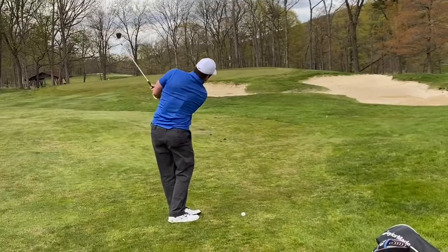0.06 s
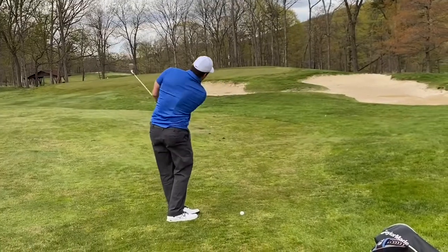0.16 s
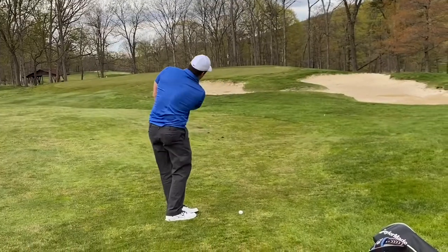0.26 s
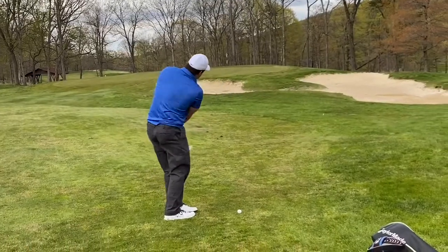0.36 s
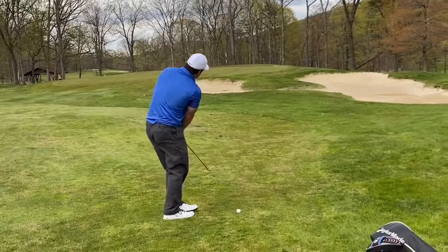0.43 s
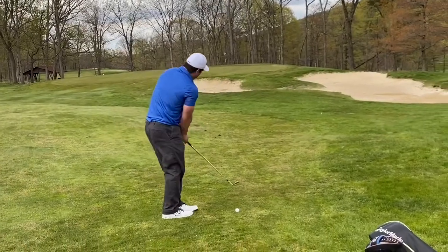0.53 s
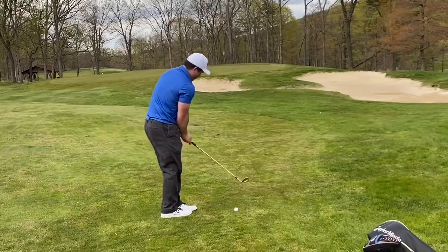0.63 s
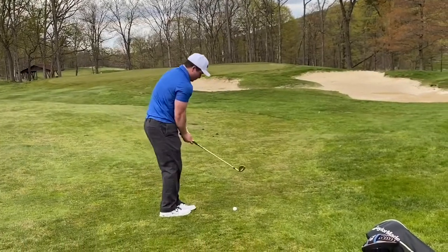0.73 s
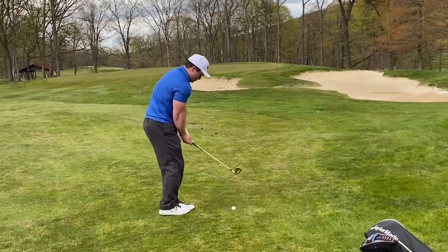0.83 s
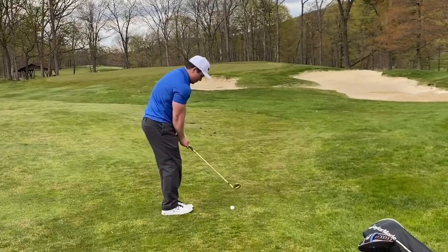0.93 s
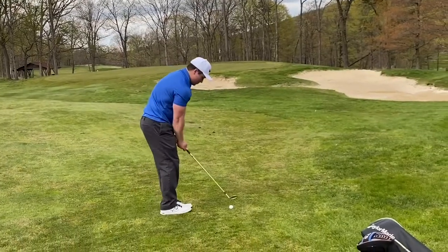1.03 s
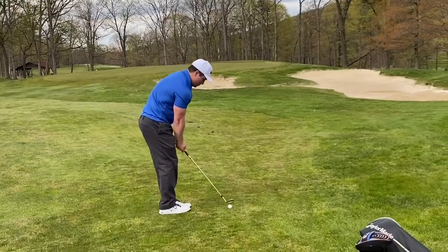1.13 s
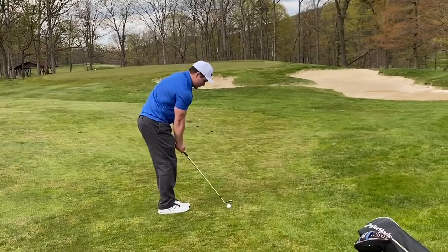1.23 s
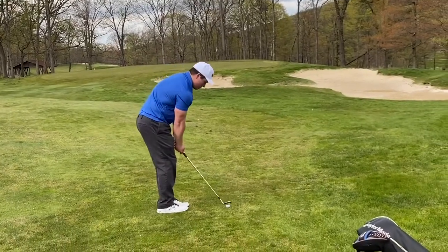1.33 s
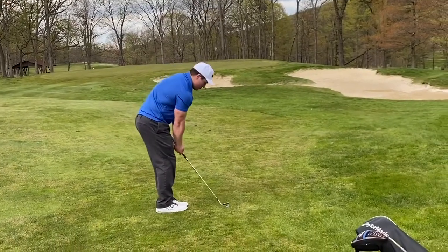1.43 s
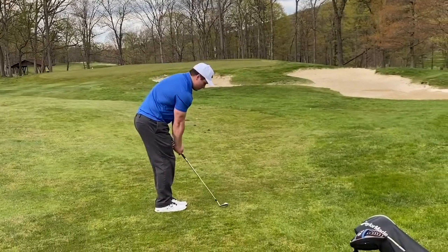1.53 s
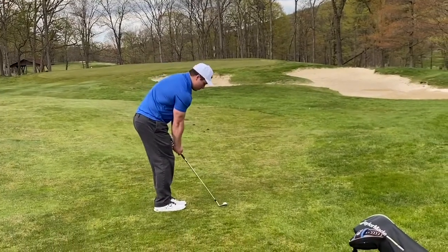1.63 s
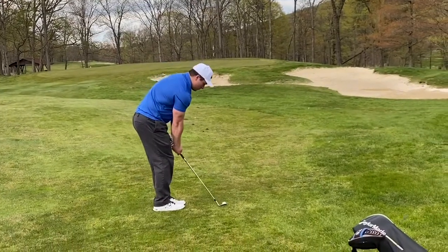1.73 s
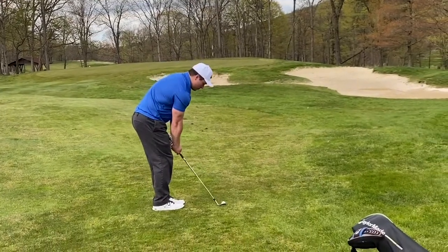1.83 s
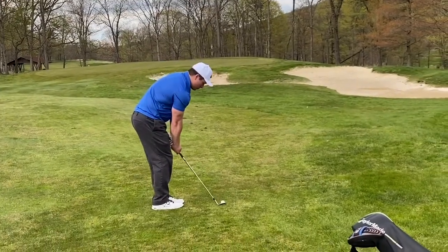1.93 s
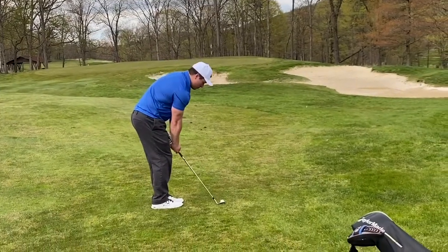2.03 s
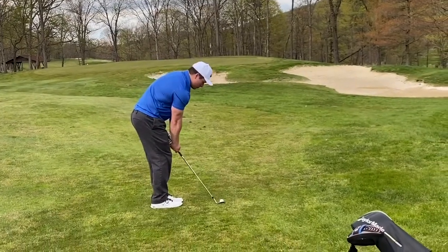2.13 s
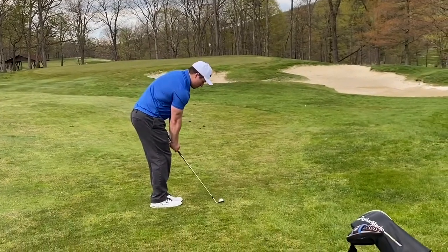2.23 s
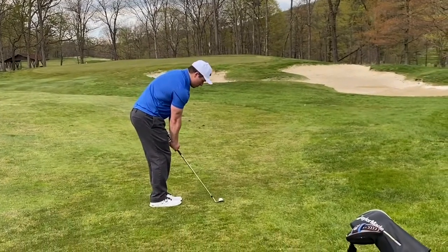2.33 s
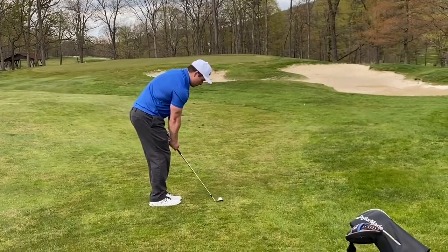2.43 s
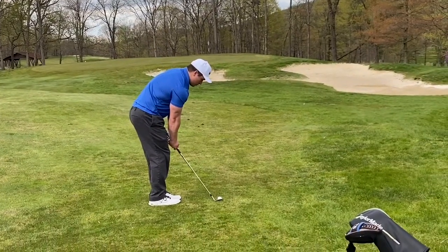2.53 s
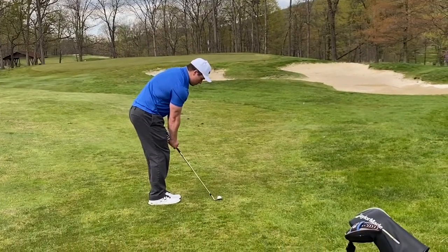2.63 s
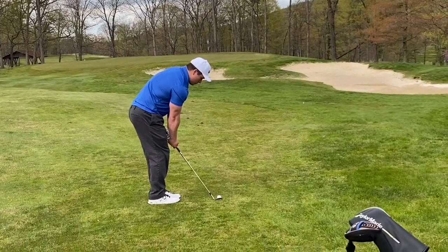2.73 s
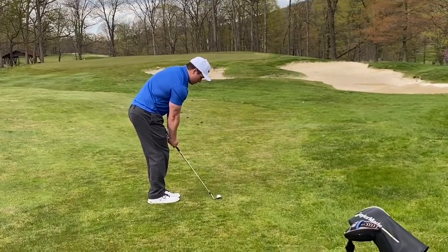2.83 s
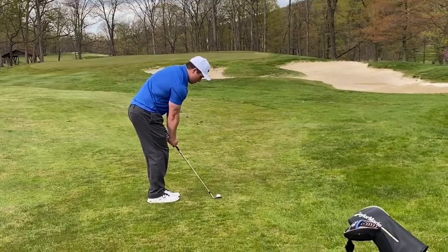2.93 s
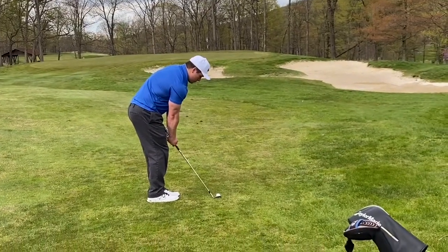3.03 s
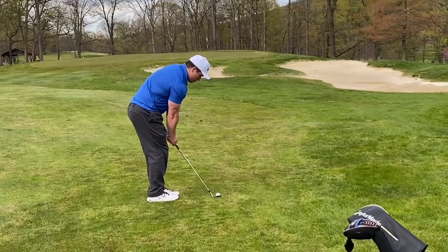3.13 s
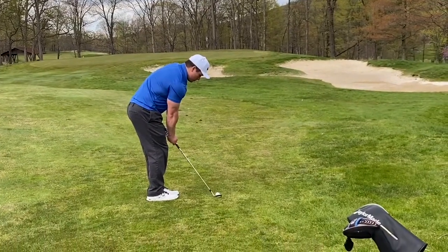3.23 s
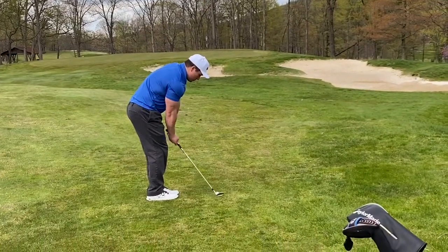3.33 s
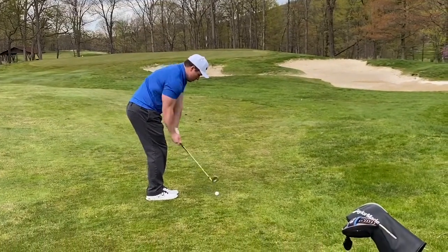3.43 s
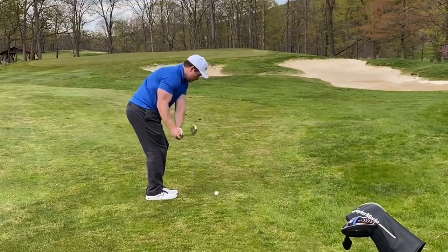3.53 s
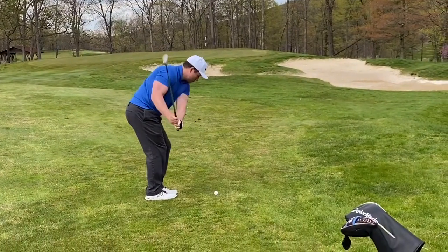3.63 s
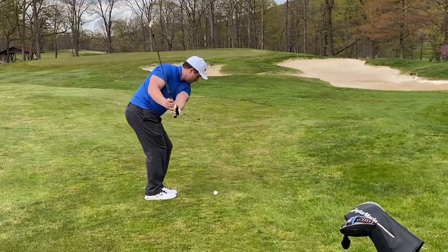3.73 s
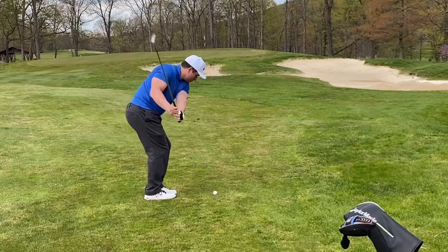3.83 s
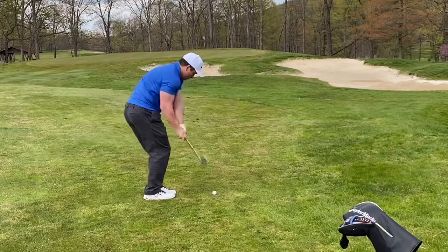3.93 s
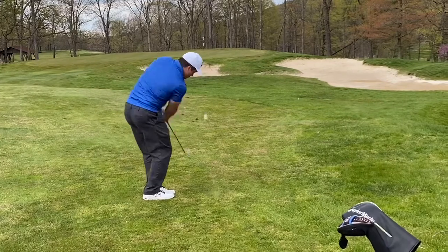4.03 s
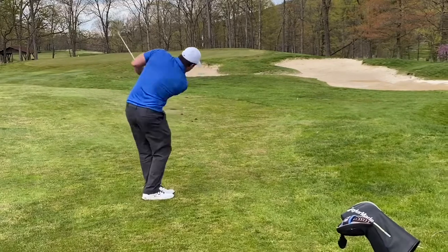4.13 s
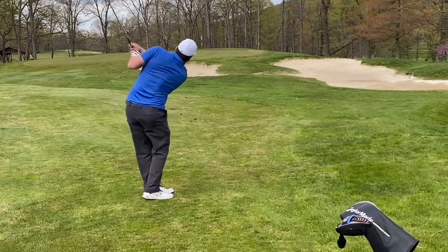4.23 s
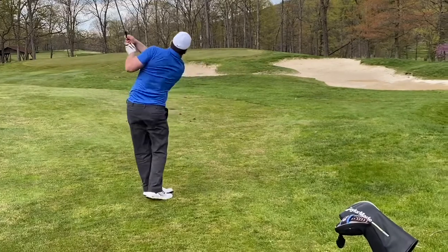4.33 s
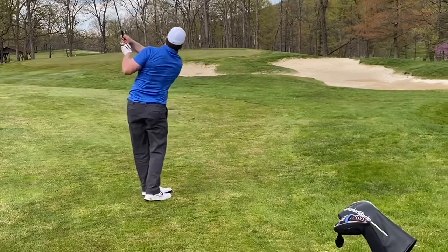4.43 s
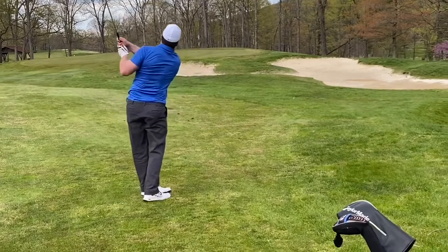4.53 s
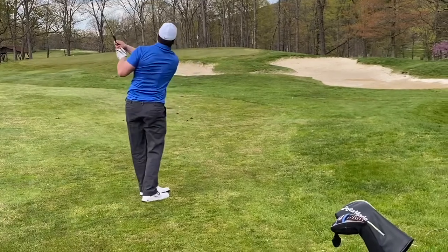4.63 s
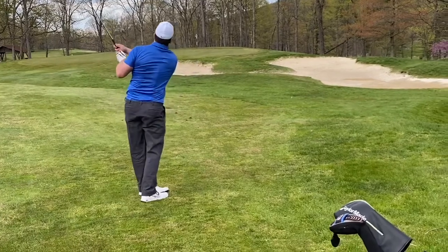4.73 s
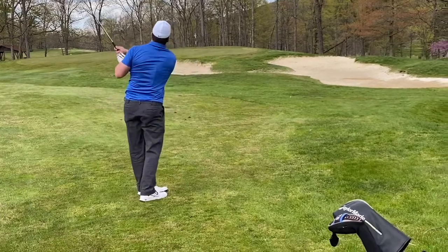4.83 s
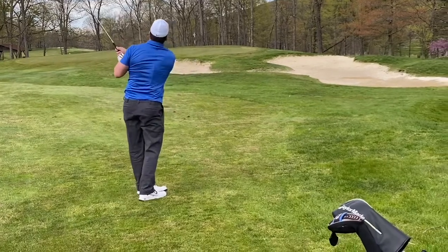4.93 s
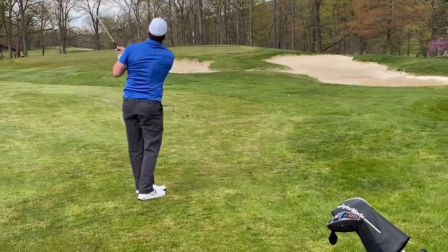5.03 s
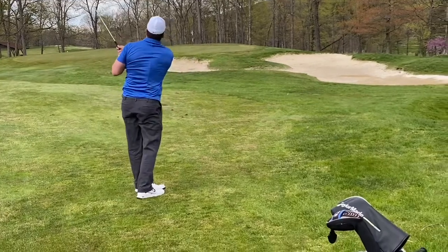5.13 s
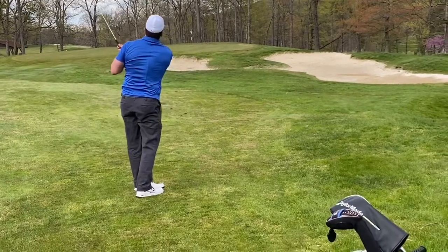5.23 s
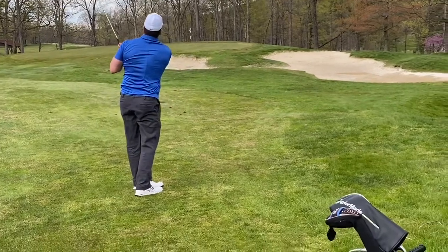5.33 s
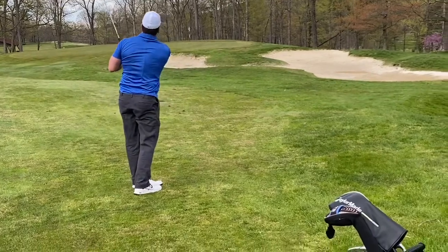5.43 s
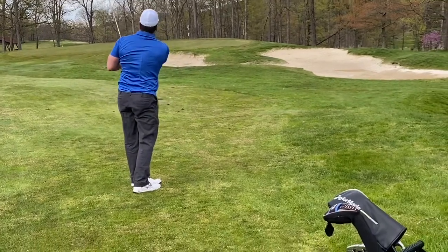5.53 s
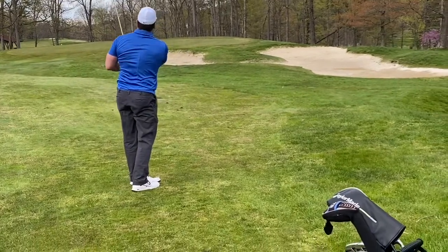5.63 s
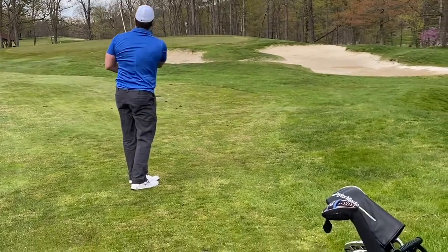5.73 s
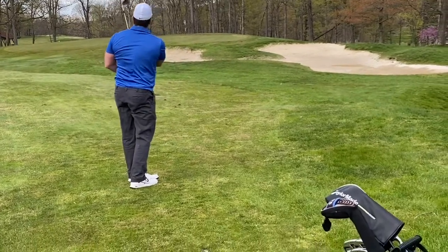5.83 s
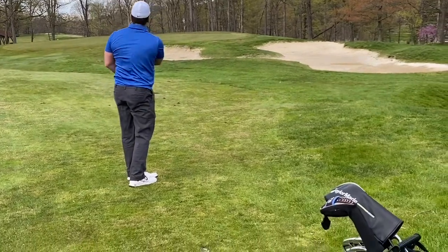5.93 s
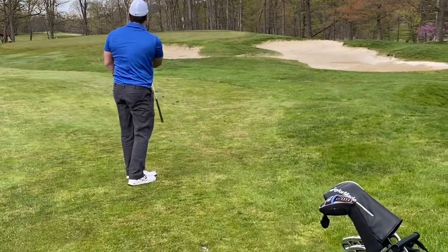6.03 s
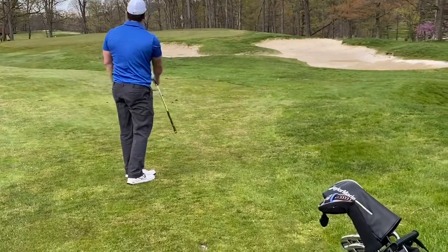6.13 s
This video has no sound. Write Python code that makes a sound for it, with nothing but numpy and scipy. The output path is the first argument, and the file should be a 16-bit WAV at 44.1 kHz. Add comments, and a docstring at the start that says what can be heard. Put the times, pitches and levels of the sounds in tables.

```python
"""An iron shot on a fairway

A few metres away, a golf club is set down in rustling grass. It whooshes down, cuts the turf and
hits the ball with a bright click over a hollow knock; the ground thumps and the follow-through
swishes. Clothes shift and something knocks lightly near the microphone. Small birds call from the
woods over a distant rumble and a light breeze."""
import sys
import numpy as np
from scipy import signal
from scipy.fft import rfft, irfft
from scipy.io import wavfile
from scipy.ndimage import uniform_filter1d

SR = 44100
rng = np.random.default_rng(int(sys.argv[2]) if len(sys.argv) > 2 else 0)


def dump(signal):
    """Clip the signal to [-1, 1] and save it as 16-bit WAV at the path in sys.argv[1]."""
    limited = np.clip(np.atleast_2d(signal).T, -1, 1)
    pcm = np.round(limited * 32767).astype(np.int16)
    wavfile.write(sys.argv[1], SR, pcm)


N = 272097
TIME, FREQ = np.arange(N) / SR, np.fft.rfftfreq(N, 1 / SR)
BALL_S = 3.8592  # the moment the club meets the ball
# six bird phrases shared by the calls, one row a note: t/s into the call, length/s, first f/Hz,
# last f/Hz, level/dB, warble depth as a share of the pitch
WHISTLE = [(0, .04, 2640, 2500, -11, 0.005), (0.03, .06, 2440, 2430, -6, .05),
           (.078, .05, 2600, 3280, -9, .016), (0.112, .05, 3330, 3000, -12, .013),
           (0.15, .072, 3020, 2840, -3.3, 0.003), (.212, .045, 2920, 2880, -13, .004)]
ANSWER = [(0, .04, 2240, 2406, -11, .005), (0.026, 0.012, 2564, 2850, -11, 0.03),
          (0.039, .046, 2159, 2250, -5, .004), (.089, .034, 2987, 2800, -1.5, 0.0046),
          (.11, .03, 2810, 2700, 1.5, .002), (.15, 0.05, 2220, 2063, -13, .002)]
SLUR = [(0, .018, 4300, 4310, -2.1, .01), (0, 0.072, 3400, 3170, -1.2, 0.046),
        (.092, .03, 2540, 2520, 1, .003), (.135, .035, 2610, 2690, -2, 0.006)]
CHIP = [(0, .014, 8100, 7500, -11, .01), (.008, .04, 7480, 7280, -3, .008)]
RISE = [(0.00049, 0.048, 5880, 6950, 0.0055, 0.027)]
FAR_CALL = [(0, 0.129, 2090, 1970, -1.2, 0.027), (0.121, 0.162, 2510, 2270, -1.1, 0.05)]


def undb(db):
    """Turn decibels into a gain."""
    return 10 ** (np.asarray(db) / 20)


def unit(x):
    """Scale to an average strength (rms) of 1."""
    return x / np.sqrt(np.mean(x ** 2))


def noise():
    """White noise."""
    return rng.standard_normal(N)


def colour(x, points):
    """Shape the tone along a curve of points: f/Hz, level/dB."""
    hz, db = np.transpose(points)
    return irfft(rfft(x) * undb(np.interp(np.log(FREQ + 1), np.log(hz), db)), N)


def band(x, hz, q):
    """A resonance around one pitch; a higher q makes it narrower."""
    return signal.lfilter(*signal.iirpeak(hz, max(q, .5), fs=SR), x)


def lowpass(x, hz, order):
    """Dull the sound above hz."""
    return signal.sosfilt(signal.butter(order, hz, fs=SR, output="sos"), x)


def wander(rate):
    """A smooth random wobble of size near 1, with about `rate` new values a second."""
    hold = int(SR / rate)
    steps = np.repeat(rng.standard_normal(N // hold + 1), hold)
    return 1.6 * uniform_filter1d(uniform_filter1d(steps, hold), hold)[:N]


def whirr(hz, width_hz):
    """A band of noise around a steady or moving pitch."""
    phase = 2 * np.pi * np.cumsum(hz * np.ones(N)) / SR
    return unit(wander(width_hz) * np.sin(phase) + wander(width_hz) * np.cos(phase))


def grains(rate, spread_db):
    """Tiny clicks of uneven size, about `rate` a second."""
    clicks = noise() * (rng.random(N) < rate / SR)
    return unit(clicks * undb(spread_db * np.minimum(rng.exponential(size=N), 4)))


def crunch(rate=260, spread_db=0.9, q=7, low_hz=900, top_hz=7000):
    """Stalks and fibres give way one by one, each ringing briefly at its own pitch."""
    pitches = np.geomspace(low_hz, top_hz, 20)
    return sum(np.sqrt(hz) * unit(band(grains(rate, spread_db), hz, q)) for hz in pitches)


def fade(start, t60):
    """A gain that jumps to 1 at the start, then falls 60 dB in t60 seconds."""
    return (TIME >= start) * np.exp(-np.log(1000) * np.clip((TIME - start) / t60, 0, 4))


def stroke(start, length, rise_s, t60):
    """A gain that rises, holds and fades."""
    release = np.where(TIME < start + length, 1, fade(start + length, t60))
    return np.clip((TIME - start) / rise_s, 0, 1) * release


def swell(peak_s, db, half_s):
    """A gain that grows to a peak and dies away again."""
    return undb(db) * np.exp(-.5 * np.minimum(((TIME - peak_s) / half_s) ** 2, 100))


def swells(rows):
    """Several swells added up."""
    return sum(swell(*row) for row in rows)


def ring(start, modes):
    """One blow sets off a group of fading tones, called modes."""
    hz, db, t60 = np.transpose(modes)[:, :, None]
    sounding = (TIME >= start) & (TIME < start + 2 * t60.max())
    age, out = TIME[sounding] - start, np.zeros(N)
    tones = undb(db) * np.exp(-np.log(1000) * age / t60) * np.sin(2 * np.pi * hz * age)
    out[sounding] = tones.sum(axis=0)
    return out


def outdoors(x, t60, top_hz):
    """Ground and trees scatter a soft echo, different on the left and right."""
    tails = [lowpass(noise(), top_hz, 2) * fade(0, t60) for _ in range(2)]
    return np.array([signal.fftconvolve(x, tail / np.linalg.norm(tail))[:N] for tail in tails])


def distant_rumble(db=-50, waver_db=0.9):
    """A far rumble, alike on both sides in the bass and wide in the middle pitches."""
    # tone of the rumble: f/Hz, level/dB
    rumble_tone = [(15, -43), (28, -21), (55, -2), (85, -0.5), (140, -6.5), (220, -15), (330, -16.5),
                   (500, -19), (880, -25), (1500, -37.5), (2600, -41), (3600, -48), (6200, -51),
                   (9000, -55.5), (11500, -54), (15000, -74)]
    # how much left and right differ: f/Hz, level/dB
    width = [(30, -21), (100, -15), (300, -7), (700, 0), (1400, 1.5), (2400, -18.5), (7000, -24.5),
             (11000, -14.5)]
    middle = unit(colour(noise(), rumble_tone)) * undb(waver_db * wander(16))
    side = colour(unit(colour(noise(), rumble_tone)), width)
    return undb(db) * (middle + side * np.array([[1], [-1]]))


def distant_hum(hz=865, width_hz=110, db=-73, waver_db=2.5):
    """A faint, wavering drone from far away."""
    return whirr(hz, width_hz) * undb(db + waver_db * wander(3.4))


def scuffs(flicker_db=2):
    """Clothes and shoes rub as the golfer shifts."""
    # tone of the rubbing: f/Hz, level/dB
    scuff_tone = [(500, -16), (1400, 2), (2400, 3), (3400, -5), (4300, -9), (5500, -15), (9000, -31)]
    # movements: peak t/s, level/dB, half-width/s
    shifts = [(.13, -72, 0.091), (.38, -75.5, 0.037), (.595, -66.5, 0.035), (.9, -75, 0.25),
              (1.18, -69, 0.05), (1.36, -73.5, 0.035), (1.48, -67, 0.038), (1.6, -77, 0.057),
              (2.56, -75.5, 0.033), (2.8, -72.5, 0.25), (4.52, -70, 0.043), (5.33, -76.5, 0.097),
              (6.133, -65.5, 0.016)]
    return unit(colour(crunch(), scuff_tone)) * swells(shifts) * undb(flicker_db * wander(40))


def snaps(rise_s=0.0032, t60=0.024):
    """Grass and gear give small snaps, each a short burst of pitched noise."""
    # snaps: t/s, level/dB, f/Hz, sharpness q
    bursts = [(.063, -63, 4000, 3), (0.099, -51.5, 2500, 3.1), (.168, -64, 3700, 2.5), (.565, -53, 2700, 3),
              (0.591, -52, 3500, 2.2), (.715, -48, 4100, 3), (1.025, -61, 5380, 4), (1.086, -47, 3470, 4),
              (1.087, -49, 6100, 4.9), (1.164, -46, 3060, 3.4), (1.221, -52, 3200, 3),
              (1.259, -56.5, 3500, 2.8), (1.421, -51, 3060, 4.5), (1.497, -56, 3000, 3.1),
              (1.651, -46.5, 9000, 0.4), (1.787, -44, 2720, 1.9), (2.545, -56, 3400, 3),
              (2.716, -58, 6170, 3), (2.834, -54, 5400, 4), (2.86, -45, 2900, 3.5), (2.88, -42, 2750, 4),
              (2.892, -37.5, 3200, 2.5), (2.9, -45.5, 5030, 2.5), (3.914, -45.5, 2850, 3.1),
              (4.537, -52, 3180, 1.5), (6.136, -49.5, 3600, 3.06), (6.161, -57.5, 5550, 3.9)]
    out = np.zeros(N)
    for s, db, hz, q in bursts:
        rise = np.clip((TIME - s) / rise_s + .5, 0, 1)
        burst = unit(band(band(noise(), hz, q), hz, q))
        out += undb(db) * burst * rise * fade(s, t60) / 2
    return out


def birds(warble_hz=65, waver=0.0035, settle=1.6, arch=0.43, hoarse_per_depth=22, branches_db=-13):
    """Notes swell and settle in pitch; warbling makes them hoarse. Branches blur them, the woods echo."""
    # calls: t/s, level/dB, pitch factor, warble factor, echo level/dB, phrase
    calls = [(.25, -76, 1.22, 1, -4, FAR_CALL), (.548, -75, 0.96, 2, -7, CHIP),
             (1.3, -72, 1.01, 1.4, -2.5, FAR_CALL), (1.953, -62.5, 1.0, .6, -12, CHIP),
             (2.217, -51.5, 1.0, .9, -16, WHISTLE), (2.827, -47.5, 1.0, 1.3, -15, WHISTLE),
             (3.24, -76, 0.94, 1.5, -8, RISE), (3.6, -49.5, 1.0, 1, -22, ANSWER),
             (3.622, -72, .98, .7, -11, CHIP), (4.822, -65.5, 0.98, 1.2, -11, CHIP),
             (5.2, -77, 1.2, 1.5, -3, FAR_CALL), (5.87, -72, 0.98, 1.6, -6, SLUR)]
    song, to_woods = np.zeros(N), np.zeros(N)
    unsteady = waver * wander(200)
    warble_rate = warble_hz * (1 + .3 * wander(60))
    warble = np.sin(2 * np.pi * np.cumsum(warble_rate) / SR) + .5 * wander(300)
    breath = (wander(600) + 1j * wander(600)) / np.sqrt(2)  # smears a pure tone into noise
    for start, call_db, ratio, rasp, woods_db, phrase in calls:
        for s, length, first_hz, last_hz, db, depth in phrase:
            on = (TIME > start + s) & (TIME < start + s + length)
            progress = np.clip((TIME[on] - start - s) / length, 0, 1)
            pitch = ratio * (last_hz + (first_hz - last_hz) * (1 - progress) ** settle)
            pitch *= 1 + rasp * depth * warble[on] + unsteady[on]
            tone = np.exp(2j * np.pi * np.cumsum(pitch) / SR)
            hoarse = np.clip(hoarse_per_depth * rasp * depth, 0, .6)
            voice = np.imag((np.sqrt(1 - hoarse ** 2) + hoarse * breath[on]) * tone)
            note = undb(call_db + db) * np.sin(np.pi * progress) ** arch * voice
            song[on] += note
            to_woods[on] += undb(woods_db) * note
    branches = undb(branches_db) * outdoors(song, t60=.2, top_hz=9000)[0]
    return song + branches + outdoors(to_woods, t60=.65, top_hz=7000)[0]


def brushing(waver_hz=45, flicker_db=2.5, start_sharp=.09, settle_s=.16):
    """The club rustles through grass, and once clothes rustle; each stroke carries a thin whistle that wavers
    and sinks as it slows."""
    # strokes: t/s, length/s, rustle level/dB, whistle level/dB, fizz level/dB; the third is clothes
    strokes = [(0.64, .53, -70.5, -75.5, -80), (0.67, .13, -72.5, -84, -75.5),
               (2.669, 0.25, -72, -81, -100), (4.445, .04, -79, -92, -92), (6.11, 0.057, -81, -88, -100)]
    # tones of the rustle and of the high fizz: f/Hz, level/dB
    rustle_tone = [(900, -7), (2000, 0), (3500, -3.5), (5000, 1.5), (6100, -1.5), (6700, -3), (7400, -8),
                   (8200, -10), (11500, -26), (15500, -32)]
    fizz_tone = [(5000, -25), (8000, -2), (11500, -1), (15500, -1.5)]
    # resonances of the whistle: f/Hz, width/Hz, level/dB
    resonances = [(2300, 400, -11), (3270, 450, -8), (4200, 400, -10), (5300, 480, 0), (6600, 900, -3)]
    blades = crunch(rate=420, spread_db=1.6, q=14, low_hz=1200, top_hz=8500)
    rustle = unit(colour(blades, rustle_tone))
    fizz = unit(colour(grains(4500, 1.9), fizz_tone))
    wavering = [(hz + waver_hz * wander(14), width, undb(db + flicker_db * wander(45)))
                for hz, width, db in resonances]
    out = np.zeros(N)
    for s, length, rustle_db, whistle_db, fizz_db in strokes:
        sinking = 1 + start_sharp * np.exp(-np.maximum(TIME - s, 0) / settle_s)
        whistle = sum(gain * whirr(hz * sinking, width) for hz, width, gain in wavering)
        grass = undb(rustle_db) * rustle + undb(whistle_db) * whistle + undb(fizz_db) * fizz
        out += stroke(s, length, rise_s=0.049, t60=0.25) * grass
    return out


def high_hiss():
    """A faint, very high hiss comes and goes."""
    return whirr(hz=12000, width_hz=1800) * swell(peak_s=1.75, db=-85, half_s=0.22)


def clink(start_s=1.787):
    """Something metal rings once, faintly."""
    # tones of the metal: f/Hz, level/dB, t60/s
    metal_modes = [(5670, -54, 0.04), (8100, -73, .06)]
    return ring(start_s, metal_modes)


def shaft_eddies(peak_s=3.83, peak_hz=1550, doubling_s=.027):
    """The shaft sheds little swirls of air, whose pitch rises as it speeds up."""
    pitch = peak_hz * 2 ** np.clip((TIME - peak_s) / doubling_s, -2, 1)
    return whirr(pitch, width_hz=1700) * swell(peak_s, db=-50, half_s=0.014)


def swish(grit_db=-4, flutter_db=1.8, spray_db=-20, finish_s=4.21, finish_t60=.5):
    """Air rushes past the club in a broad, gritty swish that dies as the club slows at the finish."""
    # tones of the rush and of its fine, high spray: f/Hz, level/dB
    rush_tone = [(120, -22.5), (220, -7), (330, 1), (480, 2), (620, -8.5), (820, 3), (1150, 0),
                 (1370, -6.5), (1700, -1.5), (2350, -7.5), (2750, -4.5), (4200, -12), (5500, -11.5),
                 (6400, -21), (8000, -29.5), (11000, -39)]
    spray_tone = [(2500, -14), (7000, 0), (11000, -2.5), (15500, -10)]
    # rushes before and after the blow: peak t/s, level/dB, half-width/s
    rushes = [(3.828, -52.5, 0.021), (4.062, -56, 0.036), (4.113, -43, 0.023), (4.148, -42.5, 0.021),
              (4.185, -50, 0.023), (4.24, -65, .03)]
    grit = undb(grit_db) * grains(900, 1.5)
    rush = unit(colour(noise() + grit, rush_tone)) * undb(flutter_db * wander(110))
    spray = undb(spray_db) * unit(colour(grains(6600, 3), spray_tone))
    slowing = np.where(TIME < finish_s, 1, fade(finish_s, finish_t60))
    return (rush + spray) * swells(rushes) * slowing


def whooshes():
    """Arms, shaft and sleeves each hum briefly at the pitch of their own swirls of air."""
    # whooshes: peak t/s, level/dB, half-width/s, f/Hz, width/Hz
    passes = [(3.827, -49, 0.019, 480, 600), (3.835, -57, .012, 3400, 1500),
              (4.087, -45, 0.0046, 1615, 700), (4.12, -45.5, 0.011, 2700, 2004),
              (4.255, -65.5, 0.048, 2300, 1703)]
    return sum(whirr(hz, width) * swell(s, db, half) for s, db, half, hz, width in passes)


def turf(start_s=3.8484, cut_db=-17, rise_s=.0035, ease_db_per_s=500, crumbs_db=-59):
    """The club tears into the grass and eases until the ball leaves; crumbs of soil patter after it."""
    # tone of tearing grass: f/Hz, level/dB
    tearing_tone = [(100, -21), (220, -16), (330, -2), (600, -7.5), (1200, 0), (1750, 4.5), (2250, -6.5),
                    (2700, -1.5), (3400, -3.5), (4500, -10.5), (6300, -7.5), (8000, -15), (11000, -14),
                    (15500, -16)]
    cut_s = BALL_S - start_s
    easing = undb(-ease_db_per_s * np.clip(TIME - start_s - rise_s, 0, cut_s))
    depth = stroke(start_s, cut_s, rise_s, t60=0.028) * easing
    tearing = unit(colour(grains(20000, 1.2), tearing_tone))
    crumbs = unit(band(grains(9000, 1.5), hz=3300, q=1.6)) * fade(BALL_S, t60=.9)
    return undb(cut_db) * depth * tearing + undb(crumbs_db) * crumbs


def club_blow(start_s, contact_s, bass_cut_hz=340):
    """One blow of the club. Longer contact dulls it, and so small a head gives little bass."""
    # tones of the strike, a low, hollow knock of club and turf under a bright click:
    # f/Hz, level/dB, t60/s
    strike_tones = [(346, -17.5, 0.032), (496, -22, 0.03), (849.5, -27, 0.014), (1000, -14.5, 0.017),
                    (1220, -17, 0.019), (1379, -9, .0055), (1670, -6, 0.0089), (1730, -14.5, 0.011),
                    (2560, -18, 0.011), (3470, -14, .013), (4860, -10.5, 0.01), (5300, -22, 0.012),
                    (6540, -25.5, 0.0084), (7700, -27.5, 0.011), (10000, -37, 0.0159), (11400, -36.5, .016)]
    softening = np.exp(-(np.pi * FREQ * contact_s / 2) ** 2)
    blow = irfft(rfft(ring(start_s, strike_tones)) * softening, N)
    return signal.sosfilt(signal.butter(2, bass_cut_hz, "high", fs=SR, output="sos"), blow)


def ground_blow(db=-10):
    """The bottom of the club meets the ground just before the ball, a softer blow."""
    return undb(db) * club_blow(start_s=3.8511, contact_s=0.00022)


def ball_click(crack_db=-19, ping_hz=3085, ping_db=-1, ping_t60=.0135, ping_rise_s=0.0035):
    """The club hits the ball with a short crack; the main tone of the club face builds up and pings."""
    blow = club_blow(BALL_S, contact_s=.00005)
    crack = unit(band(noise(), hz=5100, q=2)) * fade(BALL_S, t60=0.0075)
    build_up = np.clip((TIME - BALL_S) / ping_rise_s + .2, 0, 1)
    ping = ring(BALL_S, [(ping_hz, ping_db, ping_t60)]) * build_up
    return undb(crack_db) * crack - blow - ping


def ball_flight(hz=6900, fall_hz_per_s=2000, db=-72, t60=1.2):
    """The spinning ball fizzes away, falling in pitch."""
    pitch = hz - fall_hz_per_s * np.clip(TIME - BALL_S, 0, 1)
    return whirr(pitch, width_hz=290) * undb(db) * fade(BALL_S, t60)


def grass_bounce(x, delay_s=.00384, db=-16, top_hz=3600):
    """The ground adds a duller copy of the sound a moment later."""
    delayed = np.interp(TIME - delay_s, TIME, x)
    return x + undb(db) * lowpass(delayed, top_hz, 1)


def thump(start_s=3.882, hz=64, db=-21, t60=0.091, rise_s=0.011):
    """A low thud of turf and air follows the blow."""
    return ring(start_s, [(hz, db, t60)]) * np.clip((TIME - start_s) / rise_s, 0, 1)


def knocks(top_hz=2750, body_lag_s=0.0023):
    """Something close by is knocked lightly: a tiny tick, a hollow shell, then its soft body."""
    # knocks: t/s, level/dB, extra body level/dB, tick level/dB
    taps = [(4.8124, -43, 7, -68), (4.819, -30.5, 7, -48), (6.0701, -25, -3, -58.5)]
    # tones of the shell and of the body behind it: f/Hz, level/dB, t60/s
    shell_modes = [(900, -8.5, 0.0046), (1540, -8, 0.0067), (1910, -11.5, 0.0053), (2400, -27, 0.0053)]
    body_modes = [(321.6, -13.5, 0.04), (510, -11, 0.0056)]
    tick = unit(band(noise(), hz=5200, q=3.2))
    ticks, hollow = np.zeros(N), np.zeros(N)
    for s, db, body_db, tick_db in taps:
        body = undb(body_db) * ring(s + body_lag_s, body_modes)
        hollow += undb(db) * (ring(s, shell_modes) - body)
        ticks += undb(tick_db) * tick * fade(s, t60=0.0046)
    return ticks + lowpass(hollow, top_hz, 8)


def breeze():
    """Gusts buffet the microphone with a deep flutter."""
    # gusts: peak t/s, level/dB, half-width/s
    gusts = [(4.94, -52.5, 0.036), (5.33, -46.5, 0.089), (5.49, -47, 0.066), (5.6, -48.5, 0.46)]
    # tone of the wind: f/Hz, level/dB
    wind_tone = [(15, -36), (30, -17), (48, 4), (90, -4), (150, -15.5), (300, -39.5), (1000, -80)]
    return unit(colour(noise(), wind_tone)) * swells(gusts)


def scene(near_db=-27, far_db=-42):
    """The shot echoes faintly over open ground, among small sounds, birds and wind."""
    strike = grass_bounce(turf() + ground_blow() + ball_click() + ball_flight())
    shot = shaft_eddies() + swish() + whooshes() + strike
    near_echo = undb(near_db) * outdoors(shot, t60=0.084, top_hz=1080)
    far_echo = undb(far_db) * outdoors(shot, t60=1.1, top_hz=1200)
    small_sounds = scuffs() + snaps() + brushing() + clink() + knocks()
    background = distant_rumble() + distant_hum() + birds() + high_hiss() + breeze()
    return shot + thump() + near_echo + far_echo + small_sounds + background


def record(dry, ceiling=0.79, top_hz=15800):
    """The microphone rounds peaks, its two openings fall out of step in the treble, the top is cut."""
    # how far the openings are out of step: f/Hz, left minus right phase/rad
    phase_gaps = [(0, 0), (2200, .06), (3100, .38), (3600, .26), (4400, 0), (6600, 0), (7200, -.3),
                  (7800, -.8), (9200, -3.14), (11100, -6.28), (13300, -9.42), (15800, -13.4)]
    hz, gap = np.transpose(phase_gaps)
    rounded = ceiling * np.tanh(dry / ceiling)
    shift = np.exp(.5j * np.interp(FREQ, hz, gap) * np.array([[1], [-1]]))
    stereo = irfft(rfft(rounded) * shift, N)
    return signal.sosfilt(signal.ellip(10, .2, 70, top_hz, fs=SR, output="sos"), stereo)


dry = scene()
out = record(dry)
dump(out)
```